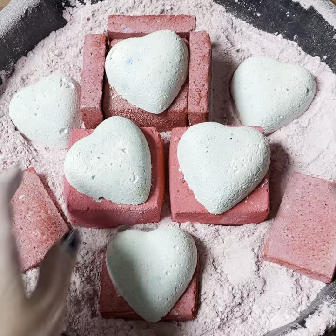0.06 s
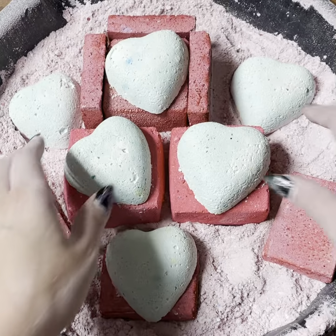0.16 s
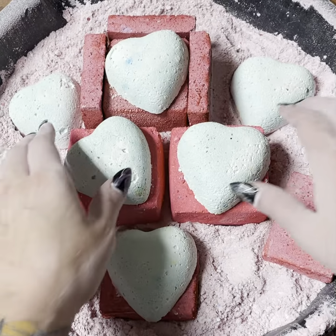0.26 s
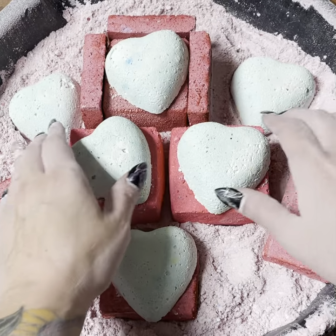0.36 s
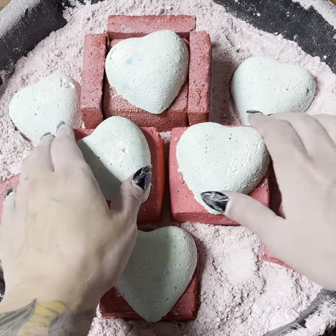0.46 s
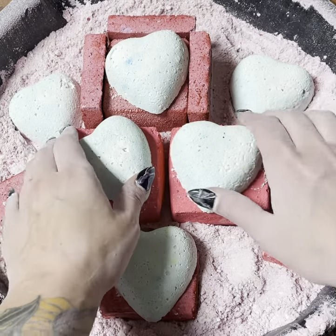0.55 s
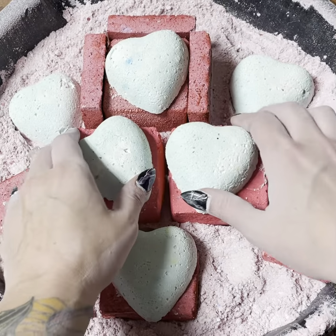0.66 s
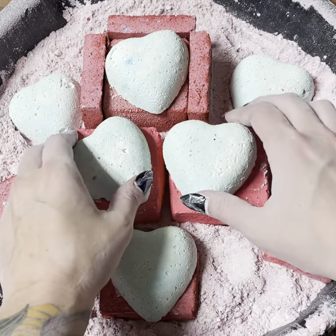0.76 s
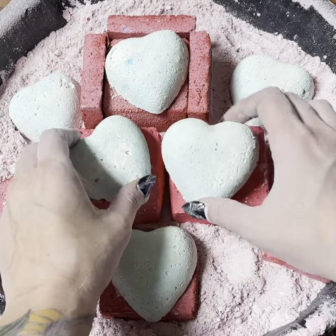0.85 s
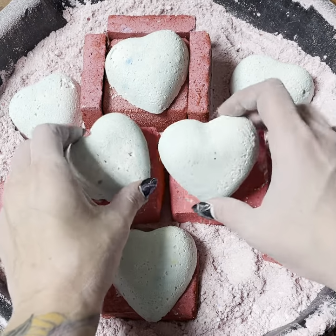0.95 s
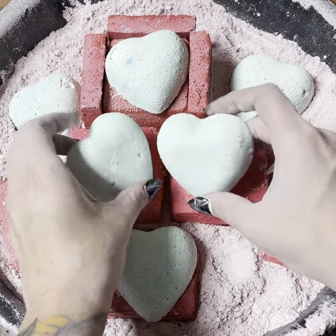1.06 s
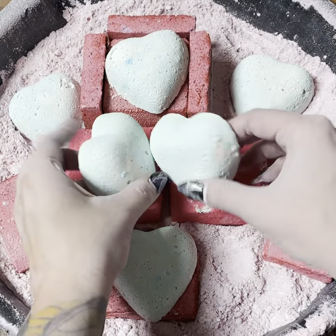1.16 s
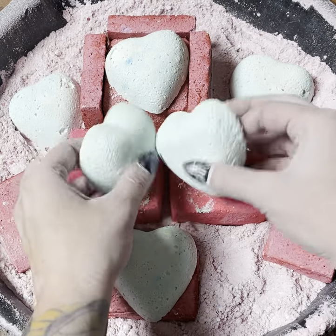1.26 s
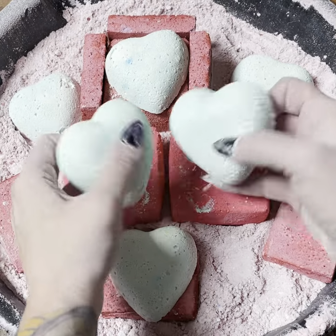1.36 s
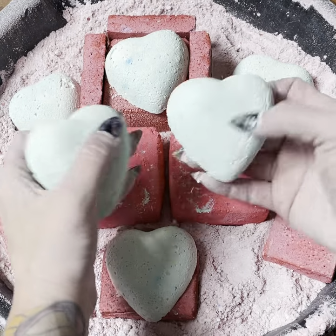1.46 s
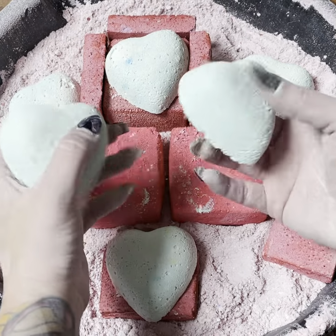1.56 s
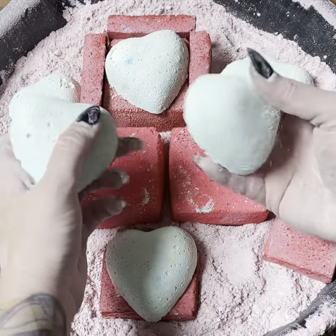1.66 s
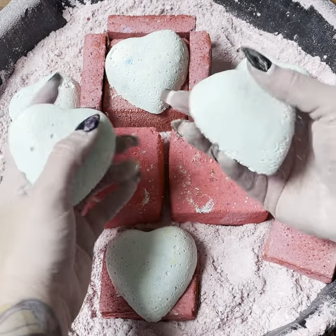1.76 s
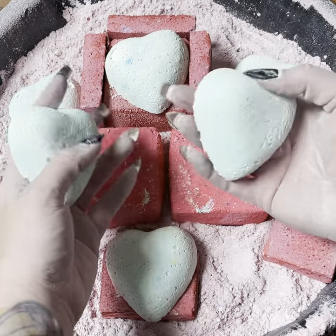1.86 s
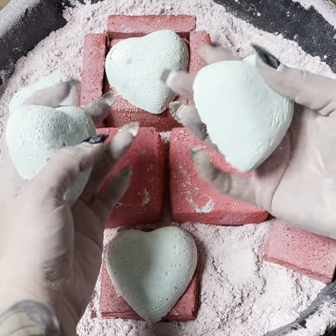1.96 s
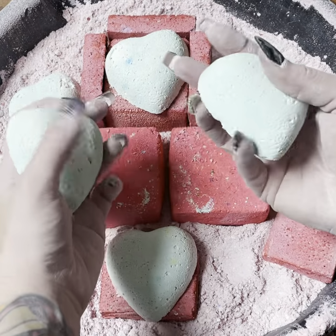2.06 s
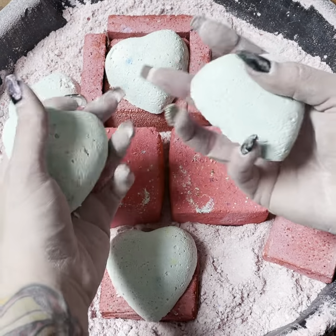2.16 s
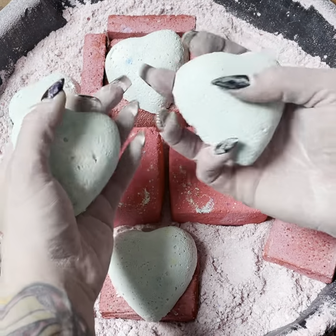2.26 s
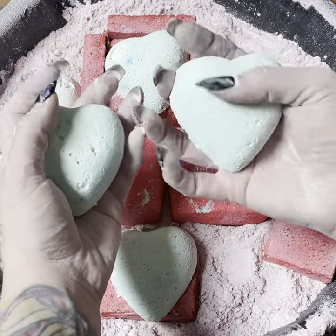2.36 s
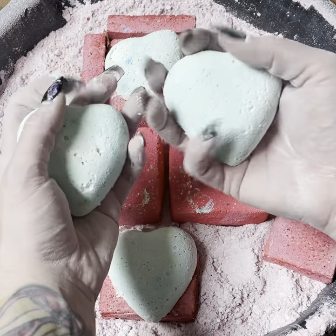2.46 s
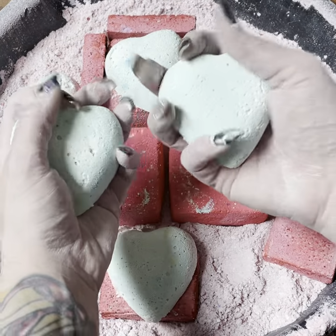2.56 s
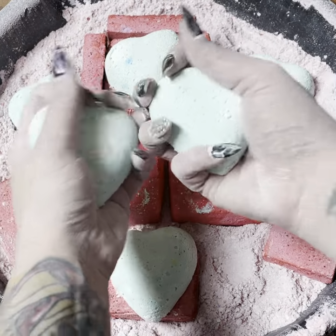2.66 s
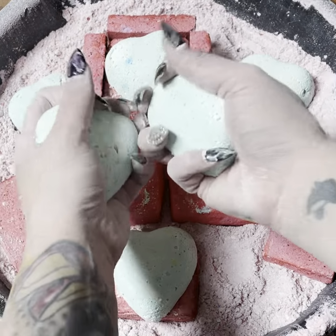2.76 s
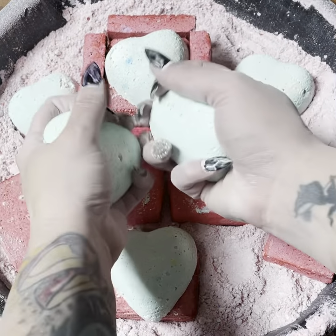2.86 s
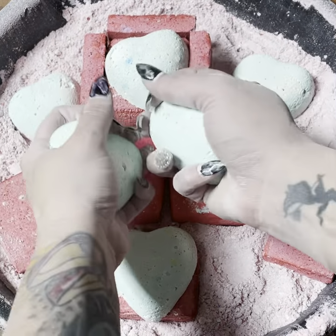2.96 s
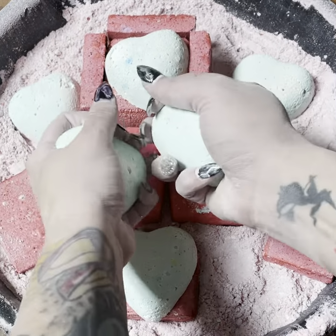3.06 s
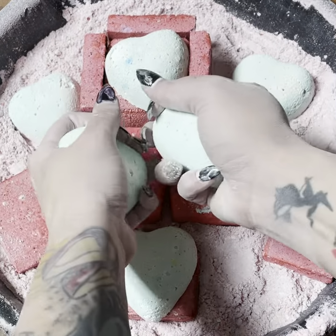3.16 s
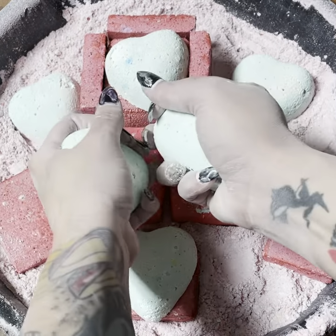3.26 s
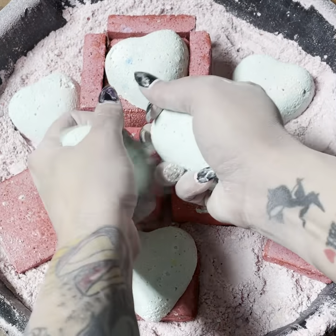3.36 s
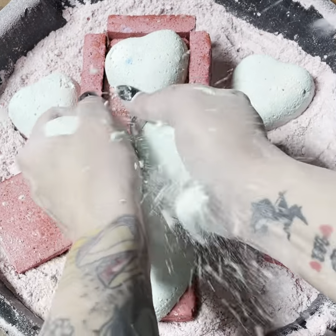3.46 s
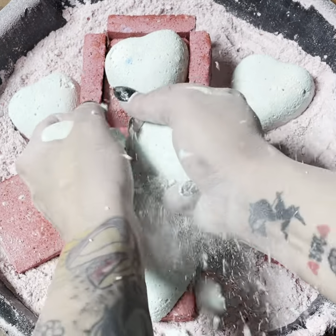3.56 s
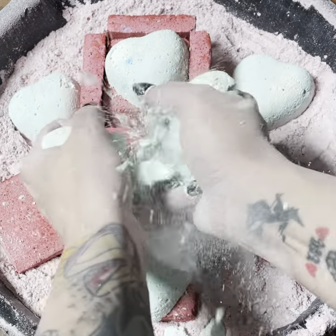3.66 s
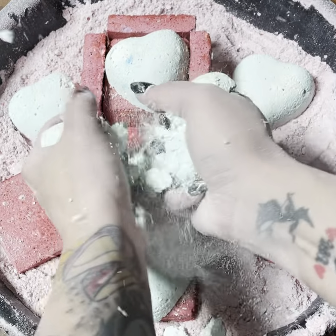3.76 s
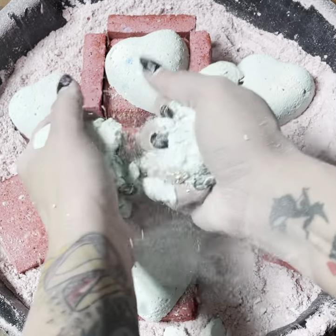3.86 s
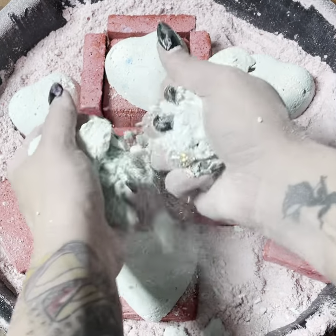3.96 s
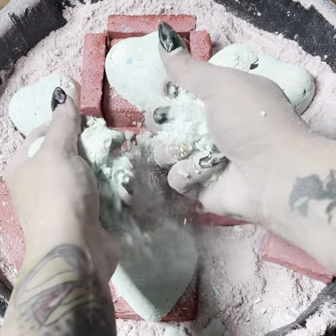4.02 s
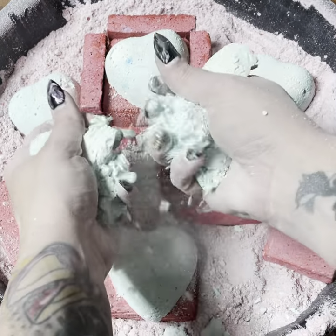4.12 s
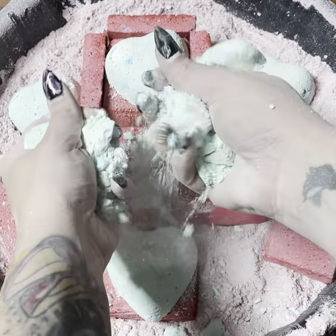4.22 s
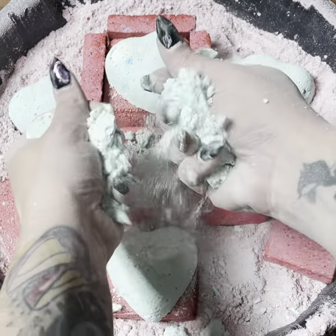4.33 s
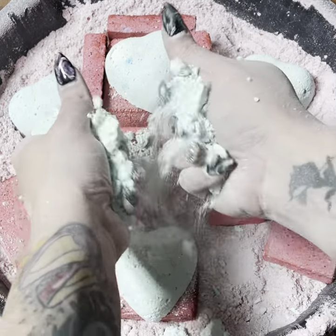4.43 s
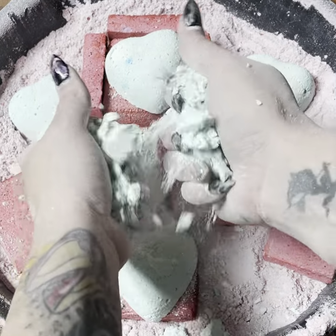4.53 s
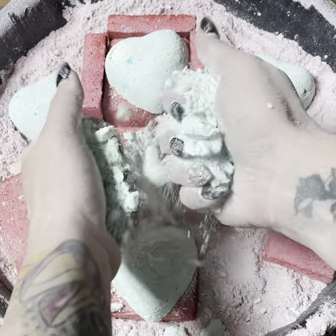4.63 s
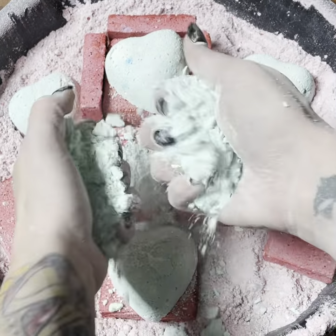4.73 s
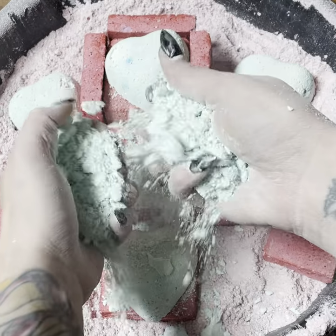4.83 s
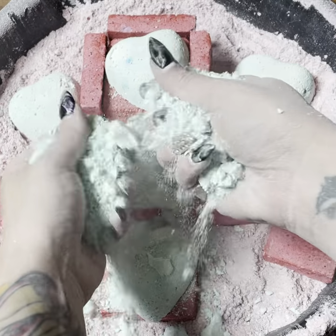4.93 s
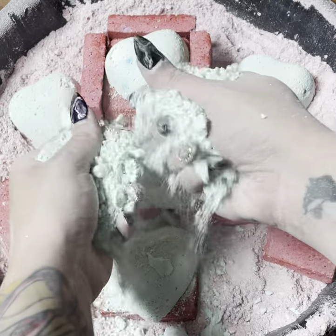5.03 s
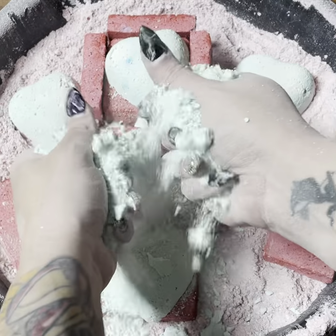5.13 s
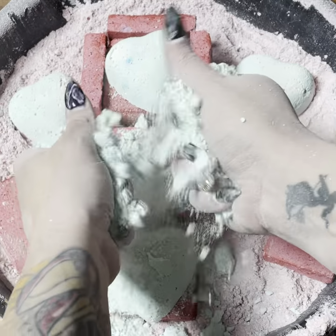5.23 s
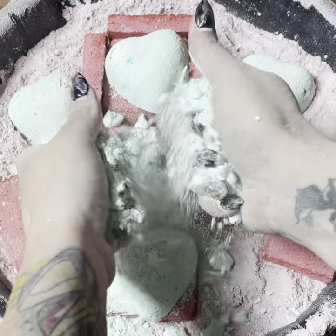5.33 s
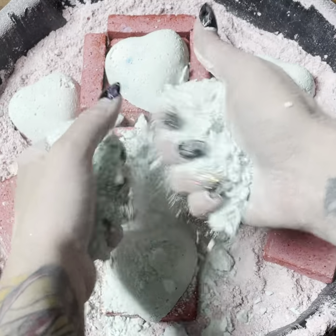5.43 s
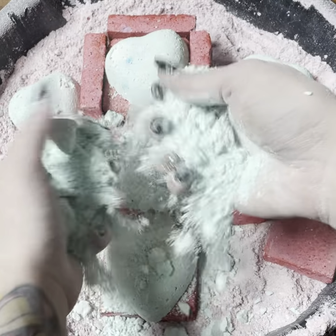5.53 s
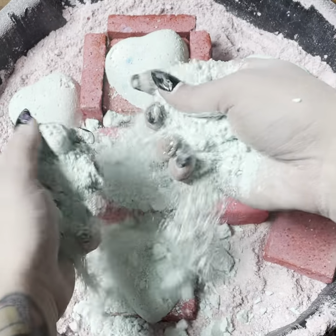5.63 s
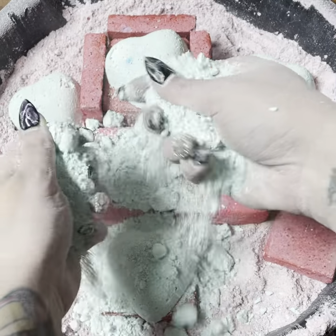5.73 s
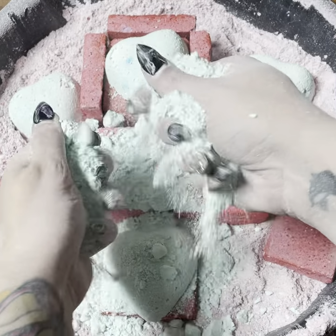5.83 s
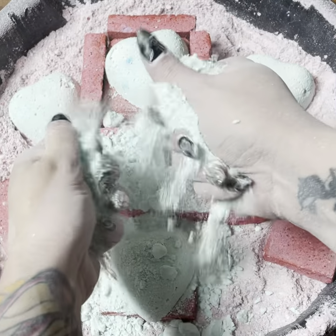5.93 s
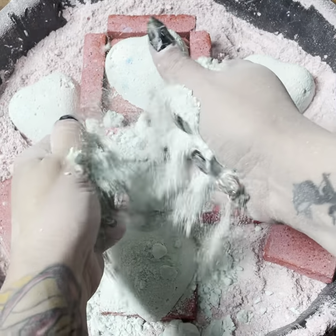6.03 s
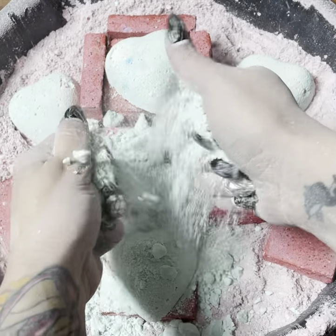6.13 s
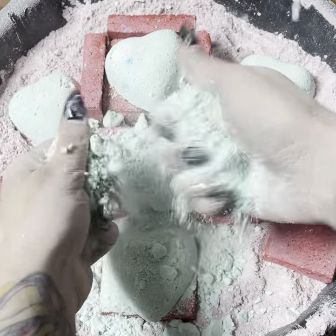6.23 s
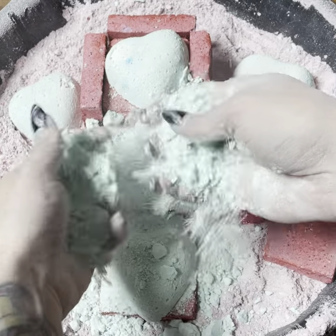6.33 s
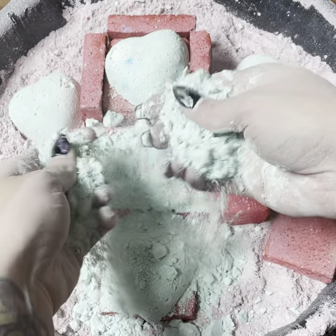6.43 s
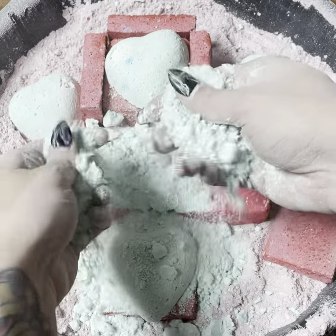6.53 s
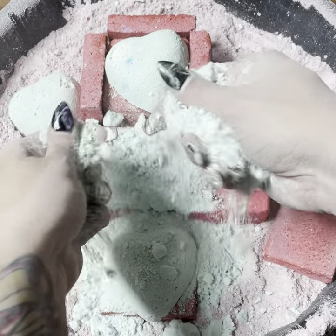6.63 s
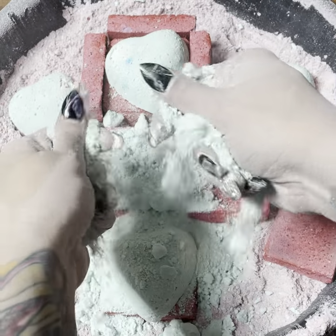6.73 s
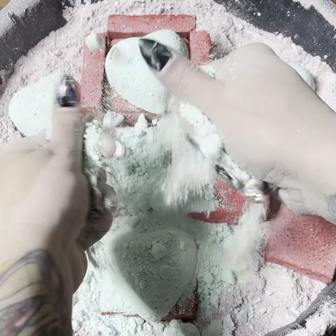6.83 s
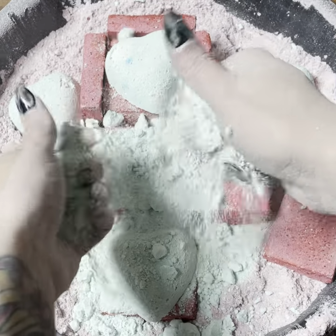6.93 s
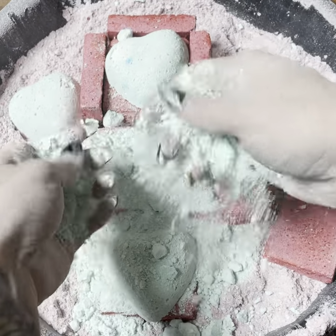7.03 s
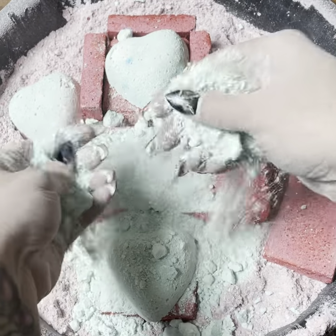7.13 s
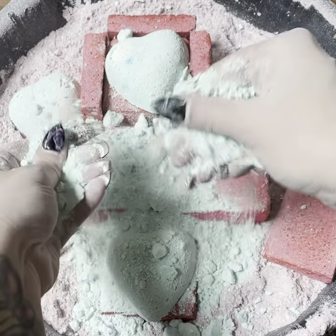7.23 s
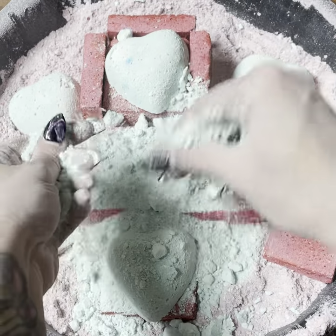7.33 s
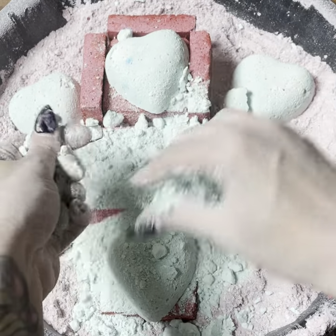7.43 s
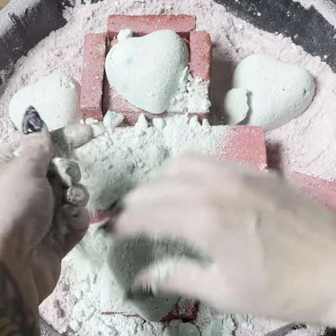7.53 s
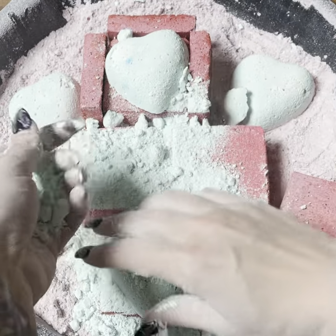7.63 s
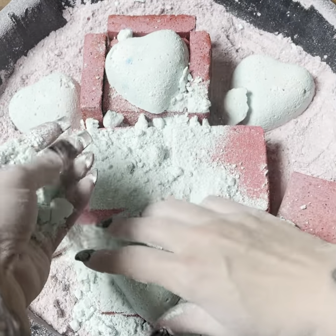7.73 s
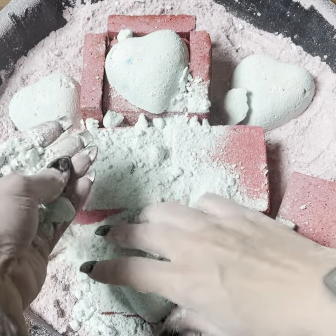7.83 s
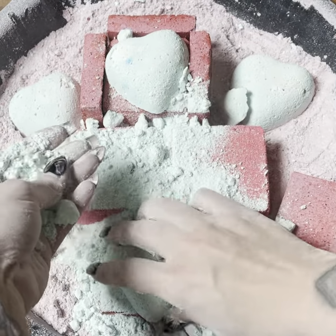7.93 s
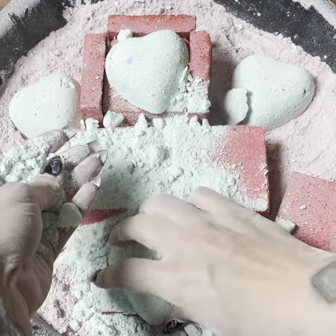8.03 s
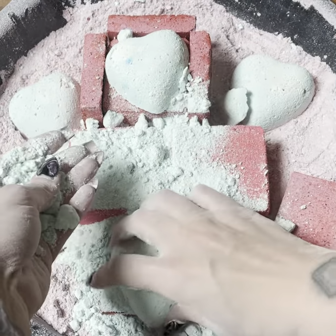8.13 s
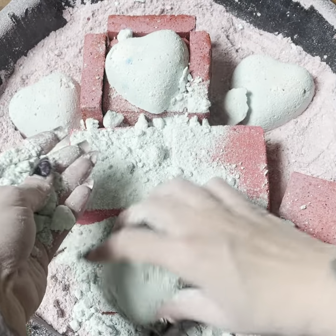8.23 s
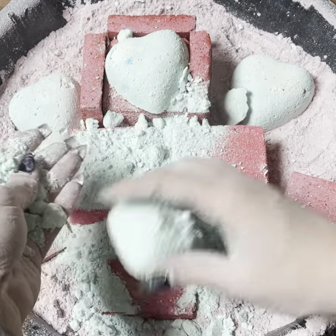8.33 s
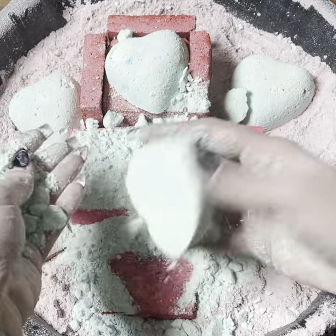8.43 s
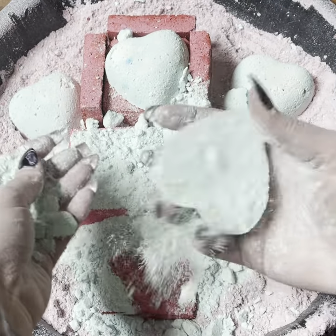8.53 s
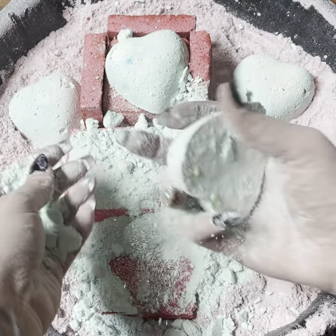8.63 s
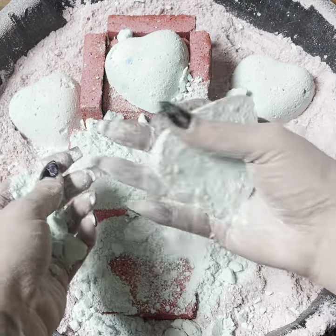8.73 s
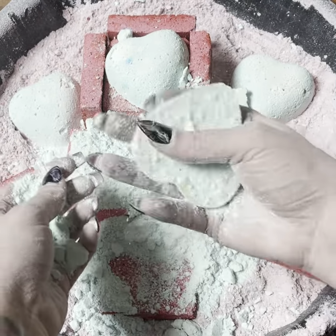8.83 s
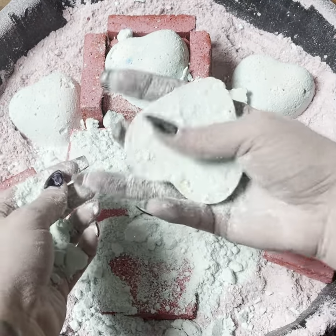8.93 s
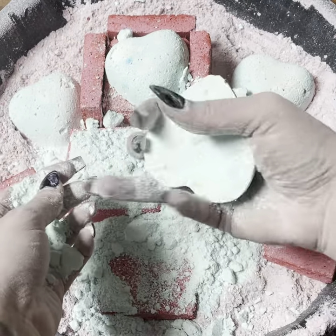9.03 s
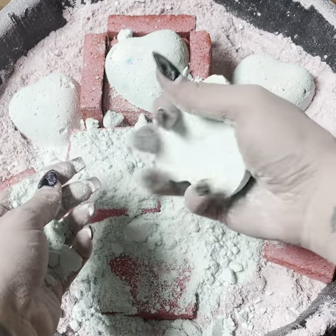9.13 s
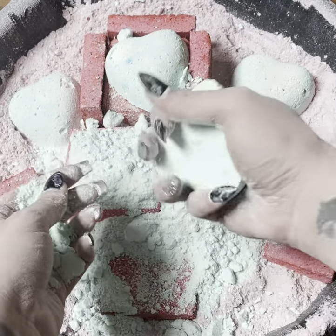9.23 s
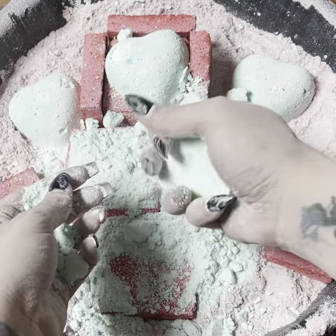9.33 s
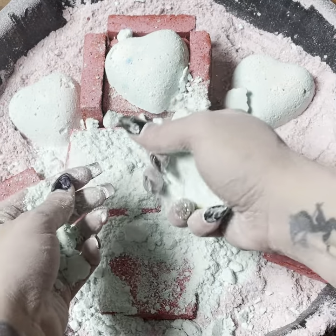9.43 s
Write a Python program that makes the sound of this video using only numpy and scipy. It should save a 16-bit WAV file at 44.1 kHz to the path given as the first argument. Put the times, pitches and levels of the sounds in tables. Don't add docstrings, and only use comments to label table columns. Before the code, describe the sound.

Hands stroke dry porous chalk cakes with ringing, scratchy rubs, two loud snaps crack, then pieces crunch and crumble into pattering, hissing powder.

```python
import sys
import numpy as np
from scipy import signal
from scipy.fft import rfft, irfft, next_fast_len
from scipy.io import wavfile
from scipy.ndimage import uniform_filter1d

SR = 44100
rng = np.random.default_rng(int(sys.argv[2]) if len(sys.argv) > 2 else 0)


def gain_from_decibels(decibels):
    exponent = np.asarray(decibels, float) / 20
    return 10 ** exponent


def log_audio(samples):
    frames = np.atleast_2d(samples).T
    limited = np.clip(frames, -1, 1)
    pcm = np.round(limited * 32767).astype(np.int16)
    wavfile.write(sys.argv[1], SR, pcm)


N = 418068

# hz, width_hz, level_db
PIECE_MODES = [(2560, 80, -2), (3240, 80, 0), (4130, 80, -3), (4780, 90, -4), (5500, 160, -2),
               (7480, 140, -3)]
# hz, density_db (per Hz)
POWDER_SPECTRUM = [(880, -6.5), (1500, -10.5), (5480, -9.5), (6050, -10.5), (7390, -8), (10900, -19.5),
                   (14000, -8), (16200, -31.5)]


def level(x):
    return x / np.sqrt(np.mean(x ** 2))


def band(x, lo_hz, hi_hz):
    return signal.sosfilt(signal.butter(2, [lo_hz, hi_hz], "bandpass", fs=SR, output="sos"), x)


def colour(x, points):
    hz, db = np.transpose(points)
    n = x.shape[-1]
    size = next_fast_len(n)
    f = np.maximum(np.fft.rfftfreq(size, 1 / SR), 1)
    gain = gain_from_decibels(np.interp(np.log(f), np.log(hz), db, -90, -90))
    return irfft(rfft(x, size) * gain, size)[..., :n]


def walk(rate_hz):
    hold = int(SR / rate_hz)
    draws = rng.standard_normal(N // 40 + 1)[:N // hold + 1]
    return 1.1 * uniform_filter1d(np.repeat(draws, hold), hold)[:N]


def curves(table, quiet_db=-120):
    s, *columns = np.transpose(table)
    return [np.interp(np.arange(N) / SR, s, c, quiet_db, quiet_db) for c in columns]


def effort(gestures):
    edge_db, bluntness = -11, 1.86
    peak_s, rise_s, fall_s, *db = np.array(gestures).T[..., None]
    t = np.arange(0, N / SR, 1 / 1000)
    before = (peak_s - t) / np.maximum(rise_s, .002)
    after = (t - peak_s) / np.maximum(fall_s, .002)
    away = np.where(t < peak_s, before, after)
    peak_power = gain_from_decibels(np.cumsum(db, axis=0)[..., 0]) ** 2
    power = peak_power @ gain_from_decibels(edge_db * away ** bluntness) ** 2
    return np.array([np.interp(np.arange(N) / SR, t, np.sqrt(p)) for p in power])


def grains(share, spread_db):
    chance = rng.random((3, 2, N))
    size = np.minimum(-np.log(1 - chance[2]), 5)
    return (chance[0] < share) * np.sign(chance[1] - .5) * gain_from_decibels(spread_db * size)


def sizes(lo_hz, octaves, share, spread_db):
    total = 0
    for k in range(octaves):
        octave_hz = lo_hz * 2 ** k
        hits = grains(share * 1.5 ** k, spread_db)
        total = total + band(hits, octave_hz, 2.19 * octave_hz) / np.sqrt(1.82 ** k)
    return total


def ring(x, modes, grip_db):
    total = 0
    for k, (hz, width_hz, db) in enumerate(modes):
        gain = (-1) ** k * gain_from_decibels(db + grip_db * np.minimum(walk(12), 1))
        total = total + gain * signal.lfilter(*signal.iirpeak(hz, hz / width_hz, SR), x)
    return total


def blend(rung, plain):
    # time_s, ring_over_rub_db
    solid = [(0, 5.5), (2.3, -3), (2.7, -7.5), (4.65, -15), (4.75, -7), (5.2, -14), (5.55, -11),
             (5.65, -1.5), (6.1, -10), (7.7, -11.5), (8.0, 0), (8.5, 3), (8.78, -3.5), (8.83, -4),
             (9.48, -3)]
    ratio = gain_from_decibels(curves(solid)[0])
    return (ratio * level(rung) + level(plain)) / np.sqrt(1 + ratio ** 2)


def spread(pair, width):
    return np.array([[1, width], [1, -width]]) @ pair


def ports(x, pan_db):
    return x * gain_from_decibels(np.array([pan_db, -pan_db]).reshape(2, -1) / 2)


def add(out, sound, start_s):
    i = int(start_s * SR)
    out[..., i:i + sound.shape[-1]] += sound[..., :N - i]


def strokes():
    # peak_s, rise_s, fall_s, rub_db
    drags = [(.15, .3, 0.11, -60.5), (.495, 0.0081, 0.28, -44.5), (.75, 0.029, 0.15, -45),
             (.95, 0.018, 0.36, -39), (1.185, 0.012, 0.28, -34.5), (1.385, .004, 0.053, -33.5),
             (1.6, 0.06, 0.092, -37.5), (1.71, 0.075, 0.034, -36), (1.78, 0.036, .06, -44.5),
             (1.865, 0.034, 0.1, -35), (2.074, 0.078, 0.077, -35), (2.26, 0.022, 0.12, -33.5),
             (2.4, 0.12, 0.058, -33.5), (2.55, 0.14, 0.24, -43), (2.92, 0.099, 0.088, -56),
             (7.81, 0.067, .03, -56), (8.07, 0.027, 0.15, -51.5), (8.43, 0.016, 0.19, -47),
             (8.62, 0.12, 0.038, -38), (8.73, 0.028, .14, -37.5), (8.845, 0.024, 0.014, -27),
             (8.9, .04, .06, -38.5), (9.035, 0.054, 0.021, -21.5), (9.1, .05, 0.054, -40.5),
             (9.2, 0.04, .3, -48), (9.473, .004, 0.015, -31)]
    # hz, width_hz, level_db
    cake_modes = [(2515, 71, -13), (3250, 69, -4.5), (4150, 32, -3.5), (4330, 80, -3), (4770, 120, -2.5),
                  (5170, 52, 0.5), (5510, 100, -8.5), (5745, 61, -1.5), (6920, 250, -15.5),
                  (7020, 73, -6.5), (7390, 370, -9.5), (8400, 52, -1)]
    # hz, density_db (per Hz)
    skin_spectrum = [(410, -12), (700, -16.5), (2320, -14.5), (2570, -5), (7570, -0.5), (10200, -4.5),
                     (13900, -3.5), (16200, -12)]
    # hz, width_hz
    gaps = [(3800, 190), (6200, 200)]
    drag = grains(.3, 1.75) * gain_from_decibels(0.65 * walk(40) + 2.94 * walk(150))
    rub = blend(ring(drag, cake_modes, grip_db=7.5), colour(drag, skin_spectrum))
    for hz, width_hz in gaps:
        rub = signal.lfilter(*signal.iirnotch(hz, hz / width_hz, SR), rub)
    return ports(spread(rub, 0.3) * effort(drags), 2.4 * walk(6) - 2.1)


def crumble():
    # peak_s, rise_s, fall_s, hiss_db, patter_over_hiss_db
    squeezes = [(3.425, 0.016, 0.011, -29.5, -5.5), (3.59, 0.13, 0.086, -38.5, 1),
                (3.73, 0.036, 0.073, -42.5, 9), (4.0, .3, 0.76, -44, 1.5), (4.43, 0.14, 0.19, -38, 0.5),
                (4.78, 0.14, 0.067, -40.5, -0.5), (5.08, 0.36, 0.28, -42, 0.5),
                (5.33, 0.22, .24, -39.5, -2.5), (5.66, 0.059, 0.19, -39, -5), (6.1, 0.36, .2, -39.5, -3.5),
                (6.5, 0.13, 0.27, -44.5, -2), (6.81, 0.26, 0.29, -43, -1.5), (7.2, 0.086, 0.16, -40.5, -5),
                (7.42, 0.04, 0.17, -47, 2.5), (7.56, 0.2, 0.088, -45, -23)]
    # peak_s, rise_s, fall_s, patter_db
    sifting = [(.55, 0.05, 0.33, -57), (.92, 0.18, 0.19, -52), (1.6, 0.83, 0.38, -59),
               (2.86, .3, 0.46, -56), (6.35, .2, 0.48, -56.5), (7.9, 0.31, 0.34, -58),
               (8.75, 0.27, 0.4, -49), (9.48, 0.12, 0.12, -47.5)]
    # hz, density_db (per Hz)
    patter_spectrum = [(100, -32.5), (170, -7), (338, -0.5), (757, -4.5), (899, -1.5), (1880, -3.5),
                       (4000, -11), (5200, -36.5), (8800, -120)]
    clumps = gain_from_decibels(2.2 * walk(45) + 2.2 * walk(130))
    crumbs = sizes(170.0, octaves=5, share=.006, spread_db=3.0) * clumps
    patter = level(colour(crumbs, patter_spectrum))
    dust = sizes(1410, octaves=3, share=.02, spread_db=3.5) * clumps
    powder = blend(ring(dust, PIECE_MODES, grip_db=11.0), colour(dust, POWDER_SPECTRUM))
    powder = powder + gain_from_decibels(-12) * level(band(grains(.0008, 3.0), 900, 8000))
    pan_db = 0.83 * walk(7.1) - .8
    hiss_gain, patter_gain = effort(squeezes)
    patter = spread(patter, .15) * (patter_gain + effort(sifting))
    return ports(patter + spread(powder, .35) * hiss_gain, pan_db)


def lumps():
    # hit_s, peak_db, ring_hz, bright_crack_db
    knocks = [(1.213, -21, 266, -52), (1.214, -16.5, 636, -34.5), (.565, -34.5, 260, -41.5),
              (2.629, -39, 665, -7.5), (2.725, -31.5, 250, -25), (2.893, -32.5, 462, -23),
              (3.052, -28.5, 386, -41), (3.32, -37, 282, -2), (3.899, -28.5, 347, -12),
              (3.985, -28, 560, -23), (4.139, -21.5, 345, -11.5), (4.407, -15, 374, -21.5),
              (4.443, -10, 278, -49), (4.444, -3, 627, -37.5), (4.811, -21.5, 273, -23),
              (4.902, -19.5, 248, -6.5), (5.534, -21, 376, -47.5), (5.64, -21.5, 477, -18),
              (5.773, -23, 441, -10), (5.933, -18.5, 610, -18), (5.988, -18.5, 300, -35),
              (7.432, -15.5, 686, -18), (7.808, -34, 257, -2.5), (8.067, -33.5, 482, -10),
              (8.445, -28.5, 497, -1), (8.738, -17, 503, -26.5), (8.812, -21, 290, -76),
              (9.283, -34.5, 245, -2.5), (9.306, -47, 646, -2)]
    # hit_s, peak_db,
    # ring_hz, bright_crack_db
    clacks = [(0.815, -24.5, 1740, -40.5), (1.444, -18, 1340, -18.5), (1.561, -34.5, 1210, -8),
              (3.099, -31.5, 1960, -18), (3.143, -29.5, 1780, -11.5), (4.039, -8, 965, -25),
              (4.096, -21.5, 1110, -17), (4.177, -13.5, 1036, -16.5), (4.445, -12, 1230, -35.5),
              (4.721, -30, 1900, -6), (4.812, -12.5, 1050, -33), (4.989, -19, 1690, -19.5),
              (5.092, -18.5, 1810, -29.5), (5.989, -5.5, 880, -17.5), (6.091, -26, 1000, -13),
              (6.098, -19.5, 1400, -23.5), (6.128, -8, 1130, -40.5), (6.132, -6.5, 1070, -36.5),
              (6.336, -5, 1476, -66), (6.475, -25, 990, -8.5), (6.741, -35.5, 958, -0.5),
              (6.891, -38, 1440, -5), (6.93, -17.5, 1210, -12.5), (7.276, -20, 1900, -12.5),
              (7.404, -21, 1060, -27), (7.746, -35, 1488, -4.5), (9.369, -33, 1677, -4)]
    # hit_s, peak_db, ring_hz, bright_crack_db
    chips = [(1.444, -22, 2380, -33), (1.584, -38, 2520, -63), (3.236, -18, 3660, -7),
             (4.058, -9.5, 2630, -33), (4.324, -6.5, 2190, -22), (4.89, -27.5, 3250, 3),
             (4.905, -23, 3400, 2), (4.958, -25.5, 3270, 4), (5.374, -18.5, 6570, -7.5),
             (5.61, -28.5, 3200, 1), (5.675, -28, 2440, 1), (5.986, -20, 2650, -11.5),
             (7.123, -24.5, 3330, -11), (7.179, -20.5, 2770, -20.5), (8.44, -33, 6000, 9.5),
             (8.507, -33, 3200, -12), (8.615, -31.5, 3200, -4.5), (8.663, -20.5, 2620, -22),
             (8.858, -21, 3430, -38), (9.187, -35, 3050, -7), (9.21, -33, 3440, -10.5)]
    t60_1khz_s, size_law, soft_law = .03, 0.27, 0.098
    delay_s = .002
    notes, cracks = np.zeros((2, N)), np.zeros((2, N))
    t = np.arange(4000) / SR
    for hit_s, db, hz, bright_db in list(knocks) + list(clacks) + list(chips):
        t60_s = t60_1khz_s * (1000 / hz) ** size_law * gain_from_decibels(-soft_law * (bright_db + 20.5))
        pan_db = -3.5 + 2 * rng.standard_normal()
        fade = gain_from_decibels(-60 * t / max(t60_s, .004))
        grit = rng.standard_normal((3, len(t)))
        note = np.sin(2 * np.pi * hz * t) * fade ** 3.54 * (1 - np.exp(-t * hz * 3))
        tick = level(band(grit[0], 0.28 * hz, 1.8 * hz + 1500)) * fade ** 4.84
        tick = gain_from_decibels(0.38 * bright_db + 4) * tick
        crack = spread(grit[1:], 0.19) * (fade ** 3.2 + 0.22 * fade ** 0.17)
        add(notes, ports(gain_from_decibels(db - 1.0) * (note + tick), pan_db), hit_s + delay_s)
        add(cracks, ports(gain_from_decibels(db + bright_db) * crack, pan_db), hit_s + delay_s)
    chalk = gain_from_decibels(13) * ring(cracks, PIECE_MODES, grip_db=5.0)
    return notes + gain_from_decibels(9) * colour(cracks, POWDER_SPECTRUM) + chalk


def snaps():
    # start_s, crack_db, tear_s, debris_t60_s, halves_ring_db
    breaks = [
        (3.431, 3, 0.0058, 0.32, 2),
        (3.665, 0, 0.0067, 0.45, 14.5),
    ]
    # start_s, level_db, length_s
    splits = [
        (3.444, -18.5, 0.0044),
        (3.677, -4, 0.0033),
    ]
    # hz, width_hz, level_db
    half_modes = [(596, 110, -2), (1830, 80, 8.5), (2200, 160, -3)]
    # hz, density_db (per Hz)
    crack_spectrum = [(120, -17.5), (250, 3), (400, -6), (1100, -16), (2030, -10), (4700, -19), (7700, -20),
                      (15000, -40.5), (16200, -45)]
    force, halves = np.zeros(N), np.zeros(N)
    t = np.arange(SR // 2) / SR
    for start_s, db, tear_s, t60_s, ring_db in breaks:
        push = gain_from_decibels(db) * (np.exp(-(t / tear_s) ** 4) + 0.081 * gain_from_decibels(-60 * t / t60_s))
        add(force, push, start_s)
        add(halves, push * gain_from_decibels(ring_db), start_s)
    for start_s, db, length_s in splits:
        add(force, gain_from_decibels(db) * np.exp(-(t / length_s - 1) ** 2 * 2), start_s)
    grit = spread(grains(0.34, 1.0), 0.49) * gain_from_decibels(2.0 * walk(120))
    tearing = level(colour(grit, crack_spectrum)) * force
    return tearing + ring(halves * level(grit), half_modes, grip_db=0.0)


def jolts():
    # start_s, puff_db, puff_s, rock_db
    shocks = [
        (3.430, 6, 0.005, 7),
        (3.666, -1.5, 0.0096, -11),
    ]
    rock_hz, rock_decay_s, rock_delay_s = 40, .025, .014
    out = np.zeros((2, N))
    t = np.arange(SR // 2) / SR
    for start_s, puff_db, puff_s, rock_db in shocks:
        puff = gain_from_decibels(puff_db) * np.sin(np.pi * np.log2(1 + t / puff_s)) / (1 + (t / 0.014) ** 2.6)
        late_s = np.maximum(t - rock_delay_s, 0)
        rock = gain_from_decibels(rock_db) * np.sin(2 * np.pi * rock_hz * late_s) * np.exp(-late_s / rock_decay_s)
        add(out, np.array([puff + rock, puff - rock]), start_s)
    return out


def handling():
    # peak_s, rise_s, fall_s, sway_db, thrum_over_sway_db
    jogs = [(.2, .5, 0.53, -52.5, -1.5), (.62, 0.16, 0.5, -36.5, -8.5), (1.0, .3, 0.37, -33.5, -11),
            (1.29, 0.11, 0.18, -31, -5), (1.72, 0.16, 0.083, -38.5, -5), (1.9, 0.085, 0.4, -45.5, -8),
            (2.32, 0.038, 0.25, -27, -16.5), (3.25, 0.67, 0.33, -31.5, -30), (3.49, 0.062, 0.12, -19.5, -6),
            (3.66, .05, 0.057, -38, 8.5), (3.75, .05, 0.37, -28, -19), (4.07, 0.034, 0.23, -44, 12.5),
            (4.47, 0.077, 0.083, -44, 15.5), (4.65, 0.22, 0.82, -37, -9), (5.3, 0.78, 0.37, -41, 1),
            (5.75, 0.32, 0.16, -47.5, 11), (6.0, 0.052, 0.13, -30.5, -6), (6.67, 0.51, 0.55, -45, -0.5),
            (7.3, 0.4, 0.73, -47.5, -1), (8.13, 0.33, .15, -36.5, -2.5), (8.29, .1, 0.043, -47, 14.5),
            (8.6, 0.23, 0.13, -40, -0.5), (9.195, 0.018, .04, -40, 3.5), (9.0, 0.5, 0.64, -47.5, -2)]
    sway_gain, thrum_gain = uniform_filter1d(effort(jogs), size=900, axis=1)
    noise = rng.standard_normal((4, N))
    sway = level(band(noise[:2], 17.8, 33.8))
    throbs = gain_from_decibels(3.7 * np.minimum(walk(14), 1))
    thrum = level(band(band(noise[2:] * throbs, 62, 107.2), 50, 151))
    thumps = level(band(grains(.001, 4.0), 160, 380)) * gain_from_decibels(-13.5)
    shaking = spread(thrum, 0.86) + spread(thumps, .4)
    return spread(sway, 1.27) * sway_gain + shaking * thrum_gain


def room_tone():
    # hz, density_db (per Hz)
    air_spectrum = [(71, -50), (120, 5), (173, -5), (319, -4.5), (459, -14), (649, -6.5), (764, -14.5),
                    (9710, -22), (15500, -29)]
    # time_s, level_db
    whine_levels = [(0, -66), (.6, -85), (1.6, -69), (1.9, -61.5), (2.8, -62), (3.2, -70.5), (9.48, -78.5)]
    whine_hz, air_db = 652, -56
    phase = 2 * np.pi * whine_hz * np.arange(N) / SR + .6 * walk(8.3)
    whine = np.sin(phase) * gain_from_decibels(curves(whine_levels)[0])
    flicker = gain_from_decibels(1.2 * walk(25))
    air = level(colour(rng.standard_normal((2, N)), air_spectrum))
    return air * gain_from_decibels(air_db) * flicker + whine


def delay_left(near):
    lag_s = 3.2e-5
    size = next_fast_len(N)
    late = np.exp(-2j * np.pi * np.fft.rfftfreq(size, 1 / SR) * lag_s)
    return np.array([irfft(rfft(near[0], size) * late, size)[:N], near[1]])


def reverb(near):
    t60_s, tail_db, gap_s = 0.13, -37.0, .002
    t = np.arange(SR // 4) / SR
    decay = gain_from_decibels(-60 * t / t60_s + tail_db) * (t > gap_s)
    tail = band(rng.standard_normal((2, len(t))), 200, 14000) * decay
    return signal.fftconvolve(near, tail, axes=1)[:, :N]


def scene():
    near = delay_left(strokes() + crumble() + lumps() + snaps())
    return near + reverb(near) + jolts() + handling() + room_tone()


def band_limit(x):
    return signal.sosfilt(signal.butter(12, 16380, fs=SR, output="sos"), x)


def record(dry):
    clipped = np.clip(dry, -1, 1)
    return band_limit(clipped)


dry = scene()
out = record(dry)
log_audio(out)
```